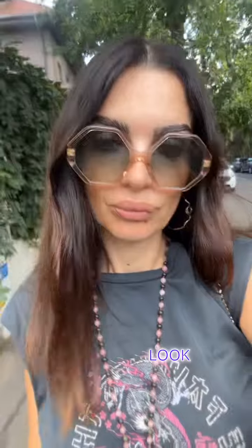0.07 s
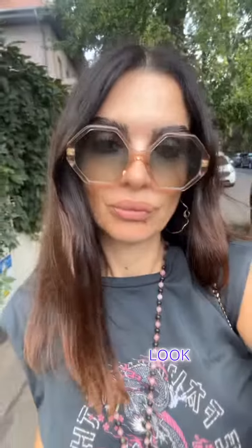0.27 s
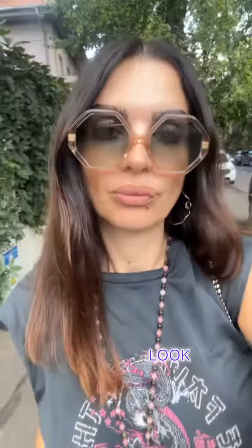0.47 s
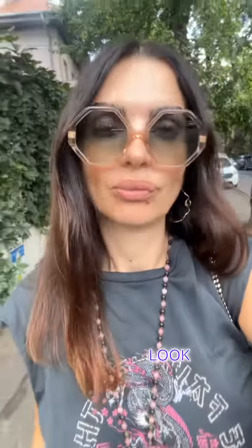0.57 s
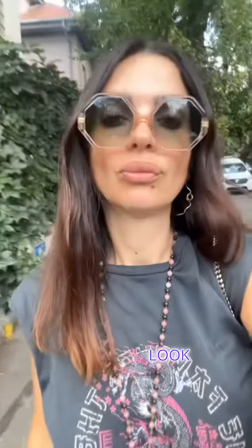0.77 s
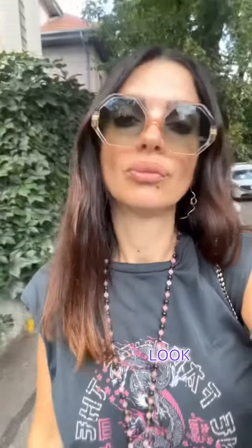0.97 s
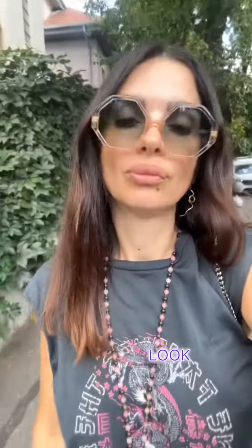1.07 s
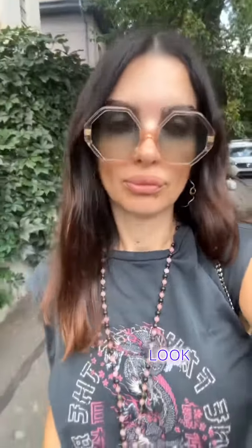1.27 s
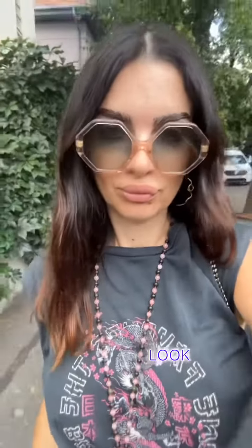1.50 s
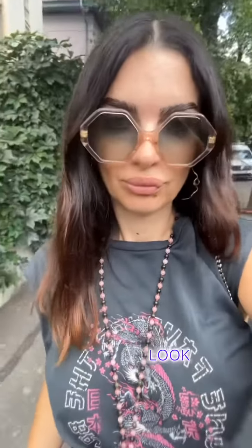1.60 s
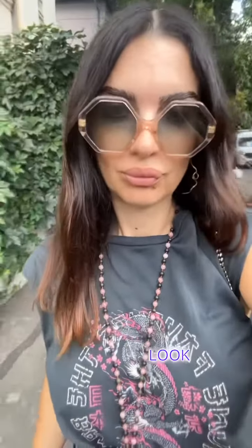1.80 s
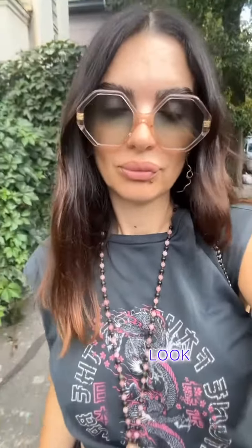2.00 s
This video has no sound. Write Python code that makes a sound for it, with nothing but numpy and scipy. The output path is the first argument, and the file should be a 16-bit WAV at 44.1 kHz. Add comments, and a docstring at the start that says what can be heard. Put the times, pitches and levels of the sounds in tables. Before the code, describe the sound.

Hard shoes step along a paved street, heels crunching grit, amid wind rumble and faint bird chirps.

```python
"""Steps on a paved street

Someone walks: heels ring and crunch on grit, soles slap, grit or cloth scuffs, beads tick.
Shaped noise gives wind, traffic wash and rustle; resonated noise gives two faint engine-like drones.
Steps are noise-driven resonances and short sagging tones; distant birds are gliding sines with echoes.
The sound starts after a fifth of a second of silence."""
import sys
import numpy as np
from scipy import signal
from scipy.fft import rfft, irfft
from scipy.io import wavfile
from scipy.ndimage import uniform_filter1d

SR = 44100
rng = np.random.default_rng(int(sys.argv[2]) if len(sys.argv) > 2 else 0)


def decibels_to_gain(level_db):
    """Convert a level in decibels to a linear amplitude gain (20 dB per decade)."""
    exponent = np.asarray(level_db, float) / 20
    return 10 ** exponent


def log_audio(samples):
    """Write samples as a 16-bit WAV file to the path given in sys.argv[1]."""
    # one column per channel
    frames = np.atleast_2d(samples).T
    # limit to full scale, then quantise
    limited = np.clip(frames, -1, 1)
    pcm = np.round(limited * 32767).astype(np.int16)
    wavfile.write(sys.argv[1], SR, pcm)


N = 90272
START_S = .197

# Shared spectrum of the street noise. Each row: frequency in Hz, relative density in dB.
STREET_SPECTRUM = [(15, -28), (27, -31), (40, -11), (60, 2.5), (90, -4), (125, -8), (180, -14), (300, -18),
                   (500, -18.5), (1000, -21), (2000, -30.5), (3000, -37.5), (4200, -41.5), (6000, -43.5),
                   (8500, -42.5), (10000, -48.5), (13000, -47), (15600, -50.5), (16000, -64)]
# Swell of the wind, before its lumps. Each row: time in seconds, rms level in dB.
WIND_LEVEL = [(.2, -50.5), (.42, -47), (.6, -52), (.85, -46.5), (1.0, -50), (1.15, -45), (1.33, -47),
              (1.5, -46), (1.7, -47), (1.82, -44), (2.05, -45.5)]
# Swell of the traffic wash. Each row: time in seconds, rms level in dB.
WASH_LEVEL = [(.2, -59), (.6, -57), (1.0, -57.5), (1.35, -55.5), (1.7, -55), (2.05, -54)]
# Swell of leaves and cloth. Each row: time in seconds, rms level in dB.
RUSTLE_LEVEL = [(.2, -73.5), (.4, -77.5), (.58, -71), (.8, -69), (1.05, -74.5), (1.24, -66), (1.35, -70.5),
                (1.48, -66.5), (1.65, -70.5), (1.8, -70), (2.05, -67)]
WIND_TOP_HZ, RUSTLE_FROM_HZ = 203.5, 4000
PATCHY_DB, LUMPY_DB = 0.58, -1  # rms depths; the sign only flips the lumps

# Engine-like drones. Each row: frequency in Hz, width of each of two passes in Hz, rms level in dB.
DRONE_TONES = [(97.9, 3.6, -59), (309.2, 4.6, -65)]

# Bird whistles. Each row: start in seconds, length in seconds, first pitch in Hz, last pitch in Hz,
# level in dB before flutter and echoes.
BIRD_NOTES = [(0.8, .07, 6220, 5900, -79), (1.479, 0.092, 4650, 4650, -71), (1.567, 0.047, 5000, 4600, -69),
              (1.568, 0.016, 5900, 5920, -64), (1.584, 0.041, 5540, 3820, -66.5),
              (1.622, 0.068, 4100, 3950, -72.5), (1.675, 0.0287, 3900, 2940, -72),
              (1.807, 0.0205, 4850, 4330, -67.5), (1.825, 0.019, 4530, 4000, -68),
              (1.845, 0.026, 4050, 3950, -70), (1.92, 0.062, 8330, 8130, -73),
              (2.026, 0.022, 8330, 8150, -69)]
BIRD_BLUR_HZ, BIRD_FLUTTER, BIRD_WOBBLE_HZ = 180, .35, 45  # noise filter width, rms depths
BIRD_ECHO_S, BIRD_ECHO_DB = .018, -3

# Bead ticks. Each row: start in seconds, peak level in dB, centre frequency in Hz.
BEAD_TICKS = [(.2490, -41.5, 8950), (0.264, -49, 8500), (.2792, -52, 8800), (0.369, -38, 8760),
              (0.6584, -46.5, 8560)]
TICK_SIGMA_S = .00006

# Spectrum of crunching grit. Each row: frequency in Hz, relative level in dB.
GRIT_SPECTRUM = [(3500, -48), (5200, 3), (6700, 9), (9500, 2), (12500, 8), (15000, 2.5), (15900, -24),
                 (16500, -40)]
GRAIN_DB = 2.2  # mean random boost per sample

# Scuffs of grit or cloth. Each row: start in seconds, level in dB, decay time in seconds.
SCUFF_EVENTS = [(.4938, -64.5, 0.017), (0.686, -69, 0.025), (1.295, -64.5, .01), (1.409, -65.5, 0.022),
                (1.6906, -64.5, 0.017), (1.900, -63.5, 0.01)]

# Heel strikes. Each row: start in seconds, blow gain in dB, grit gain in dB, rattle decay in seconds,
# tilt of the modes in dB per octave.
HEEL_STRIKES = [(0.556, -49, -64, 0.0036, -0.5), (0.5643, -61, -62, 0.0078, 5),
                (1.205, -51, -54, 0.0043, 1), (1.211, -50, -61.5, 0.019, -3.5),
                (1.763, -54.5, -70.5, .008, -5.5)]
# Heel resonances. Each row: frequency in Hz, width of each of two passes in Hz, gain in dB before tilt.
HEEL_RESONANCES = [(416, 420, 1.5), (607, 460, 0.5), (920, 620, 3.5), (1280, 840, 1), (1800, 450, -1),
                   (2600, 750, -5), (3440, 450, -1.5)]
RATTLE_PER_S, FIRST_BLOW = 2500, 1.3
CRACK_S, CRACK_DB = 0.00054, 3.5
GRIT_TAIL_DB, GRIT_TAIL_S = -2.5, 0.075  # time to fall 26 dB

# Sole slaps. Each row: start in seconds, snap gain in dB, snap frequency in Hz,
# thud gain in dB before doubling.
SOLE_SLAPS = [(0.5965, -47, 2600, -46), (0.6313, -50, 2270, -51.5), (.6587, -45.5, 2140, -50),
              (1.2517, -23, 2330, -30.5), (1.4094, -43, 1960, -50), (1.8435, -41, 2210, -43.5),
              (1.9007, -42, 2660, -45.5)]
SNAP_SIGMA_S, SOLE_EDGE_HZ = .0002, 3800
THUD_TOP_HZ, THUD_END_HZ = 1100, 330
THUD_DELAY_S, THUD_FALL_S, THUD_FADE_S = .0003, .0013, .0016
WALL_S, WALL_DB = .0058, -9
SLAP_TAIL_DB, SLAP_TAIL_S = -21.5, 0.046  # dB re snap gain; time to fall 26 dB


def evened(x):
    """Scales to rms 1."""
    return x / np.sqrt(np.mean(x ** 2) + 1e-20)


def read(points, hz):
    """Reads a spectrum on a log-frequency axis."""
    f, value = np.transpose(points)
    return np.interp(np.log(hz + 1), np.log(f + 1), value)


def add(mix, s, sound):
    """Mixes a sound in at time s."""
    part = mix[round(s * SR):][:len(sound)]
    part += sound[:len(part)]


def resonate(x, hz, width_hz):
    """One-pole resonance: shift the pitch to zero, low-pass, shift back."""
    turn = np.exp(2j * np.pi * np.cumsum(hz * np.ones(len(x))) / SR)
    r = np.exp(-np.pi * width_hz / SR)
    return 2 * (turn * signal.lfilter([1 - r], [1, -r], x / turn + 1e-18)).real


def resonate_twice(x, hz, width_hz):
    """Two equal resonances in series, for steeper skirts."""
    return resonate(resonate(x, hz, width_hz), hz, width_hz)


def coloured(x, points):
    """Filters a sound by a spectrum table."""
    gain = decibels_to_gain(read(points, np.fft.rfftfreq(len(x), 1 / SR)))
    return irfft(rfft(x) * gain, len(x))


def street():
    """Lumpy wind, traffic wash and rustle: bands of one patchy noise, each with its own swell."""
    frames, hz = N // 256 + 5, np.fft.rfftfreq(2048, 1 / SR)[:, None]
    a, b, patches = rng.standard_normal((frames, 1025, 3)).T
    patches = uniform_filter1d(patches, size=30, axis=0)  # across frequency
    patches = evened(uniform_filter1d(patches, size=14, axis=1))  # across time
    z = (a + 1j * b) * decibels_to_gain(read(STREET_SPECTRUM, hz) + PATCHY_DB * patches)
    t = np.arange(N) / SR

    def band(share, curve):
        """One power share of the noise under its level curve."""
        noise = signal.istft(z * np.sqrt(share), nperseg=2048, noverlap=1792)[1][:N]
        return evened(noise) * decibels_to_gain(np.interp(t, *np.transpose(curve)))

    low = 1 / (1 + (hz / WIND_TOP_HZ) ** 4)
    high = 1 - 1 / (1 + (hz / RUSTLE_FROM_HZ) ** 4)
    wind = band(low, WIND_LEVEL)
    wash = band(np.clip(1 - low - high, 0, 1), WASH_LEVEL)
    rustle = band(high, RUSTLE_LEVEL)
    lumps = evened(sum(np.sin(2 * np.pi * (f * t + rng.random())) / np.sqrt(f)
                       for f in np.geomspace(3, 25, num=20)))
    return wind * decibels_to_gain(LUMPY_DB * lumps) + wash + rustle


def drones():
    """Narrow resonances on noise: wavering low tones."""
    return sum(decibels_to_gain(db) * evened(resonate_twice(rng.standard_normal(N), hz, width_hz))
               for hz, width_hz, db in DRONE_TONES)


def bird(s, length_s, from_hz, to_hz, db):
    """A gliding sine with random flutter and wobble, smeared by decaying noise echoes."""
    n = round(length_s * SR)
    u = np.arange(n) / n
    shake, wobble = (evened(resonate_twice(v, 0, BIRD_BLUR_HZ))[:n]
                     for v in rng.standard_normal((2, 6000)))
    flutter = 1 + BIRD_FLUTTER * shake
    hz = from_hz + (to_hz - from_hz) * u + BIRD_WOBBLE_HZ * wobble
    note = np.sin(2 * np.pi * np.cumsum(hz) / SR) * np.sin(np.pi * u) ** 0.17 * flutter
    echoes = rng.standard_normal(4000) * np.exp(-np.arange(4000) / SR / BIRD_ECHO_S)
    echoes *= decibels_to_gain(BIRD_ECHO_DB) / np.linalg.norm(echoes)
    echoes[0] = 1  # direct sound
    return s, decibels_to_gain(db) * np.sqrt(2) * signal.fftconvolve(note, echoes)


def tick(s, db, hz):
    """Two beads touch: a very short cosine under a bell curve."""
    t = np.arange(-20, 21) / SR
    return s, decibels_to_gain(db) * np.cos(2 * np.pi * hz * t) * np.exp(-.5 * (t / TICK_SIGMA_S) ** 2)


def grit(samples):
    """Bright crunchy noise made of uneven grains."""
    grains = decibels_to_gain(GRAIN_DB * rng.exponential(1, samples))
    return evened(coloured(rng.standard_normal(samples) * grains, GRIT_SPECTRUM))


def scuff(s, db, decay_s):
    """A brief rub of grit noise, quick in and slower out."""
    t = np.arange(3000) / SR
    return s, decibels_to_gain(db) * grit(len(t)) * np.minimum(t / 0.0012, 1) * np.exp(-(t / decay_s) ** 2)


def heel(s, blow_db, grit_db, decay_s, tilt_db):
    """A rattle of small impacts rings the heel modes while grit crunches and lingers."""
    t = np.arange(5000) / SR
    burst = np.minimum(t / 0.00023, 1) * np.exp(-(t / decay_s) ** 1.5)
    size, chance = rng.standard_normal(len(t)), rng.random(len(t))
    impacts = size * (0.14 + (chance < RATTLE_PER_S / SR))  # sparse hits over faint noise
    first = FIRST_BLOW * (np.arange(len(t)) == 14)
    drive = evened(impacts + first) * burst
    body = 0
    for hz, width_hz, db in HEEL_RESONANCES:
        gain = decibels_to_gain(db + tilt_db * np.log2(hz / 1000)) * np.sqrt(SR / (2 * width_hz))
        body = body + gain * resonate_twice(drive, hz, width_hz)
    crunch = burst * (1 + decibels_to_gain(CRACK_DB) * np.exp(-t / CRACK_S))
    linger = decibels_to_gain(GRIT_TAIL_DB) * np.exp(-t / GRIT_TAIL_S * 3)
    return s, decibels_to_gain(blow_db) * body + decibels_to_gain(grit_db) * grit(len(t)) * (crunch + linger)


def slap(s, snap_db, hz, thud_db):
    """A snap of about two cycles, a thud sagging in pitch, one wall echo and a short dull tail."""
    lead_s = .002  # room for the rise of the snap
    t = np.arange(3000) / SR - lead_s
    after = np.maximum(t - THUD_DELAY_S, 0)
    snap = np.sin(2 * np.pi * hz * t) * np.exp(-(t / SNAP_SIGMA_S) ** 2 / 2)
    sag_hz = THUD_END_HZ + (THUD_TOP_HZ - THUD_END_HZ) * np.exp(-after / THUD_FALL_S)
    thud = np.sin(2 * np.pi * np.cumsum(sag_hz * (after > 0)) / SR - 1.2)
    thud = thud * np.minimum(after / 0.0003, 1) * np.exp(-after / THUD_FADE_S)
    dull = signal.firwin(numtaps=81, cutoff=SOLE_EDGE_HZ, fs=SR)
    knock = np.convolve(decibels_to_gain(snap_db) * snap + decibels_to_gain(thud_db) * 2 * thud, dull, "same")
    echo = decibels_to_gain(WALL_DB) * np.roll(knock, round(WALL_S * SR))
    tail = evened(np.convolve(knock, rng.standard_normal(len(t)))[:len(t)])
    tail = tail * np.exp(-after / SLAP_TAIL_S * 3) * np.minimum(after / WALL_S, 1) ** 2
    return s - lead_s, knock + echo + decibels_to_gain(snap_db + SLAP_TAIL_DB) * tail


def scene():
    """The street with birds, ticks and steps on top."""
    mix = street() + drones()
    for source, table in ((bird, BIRD_NOTES), (tick, BEAD_TICKS), (scuff, SCUFF_EVENTS),
                          (heel, HEEL_STRIKES), (slap, SOLE_SLAPS)):
        for row in table:
            add(mix, *source(*row))
    return mix[None]


def band_limit(x):
    """A steep low-pass at the top of the band."""
    return signal.sosfilt(signal.butter(12, 16470, fs=SR, output="sos"), x)


def record(dry):
    """Silence until START_S, then a 6.5 ms linear fade-in."""
    gate = np.clip((np.arange(N) / SR - START_S) / 0.0065, 0, 1)
    return band_limit(dry * gate)


dry = scene()
out = record(dry)
log_audio(out)
```